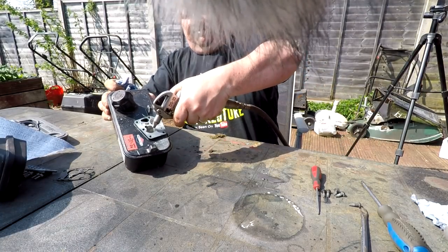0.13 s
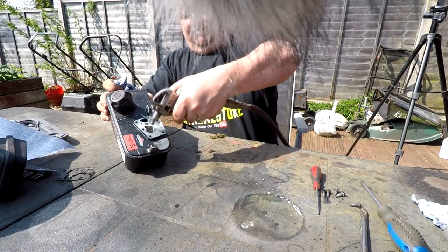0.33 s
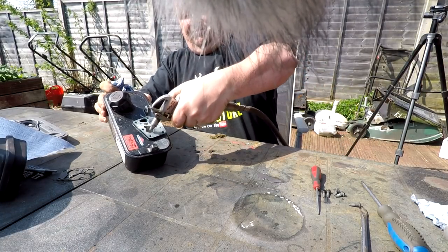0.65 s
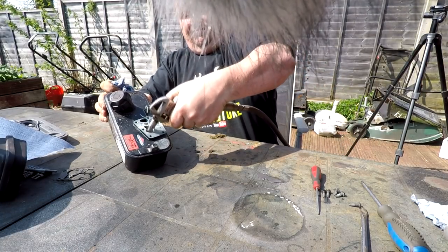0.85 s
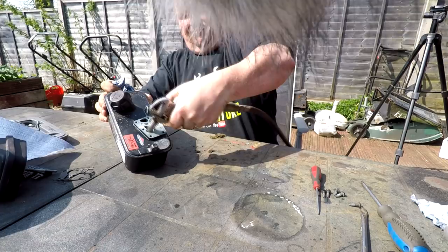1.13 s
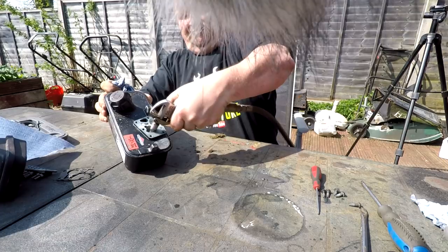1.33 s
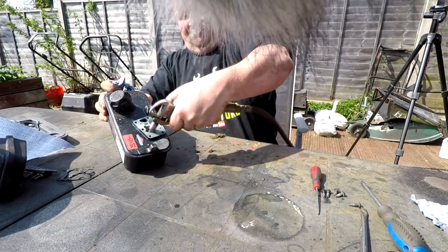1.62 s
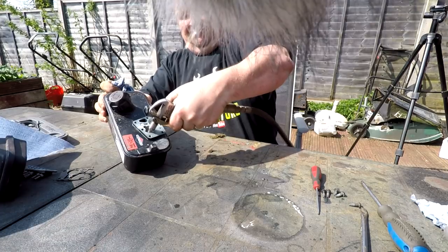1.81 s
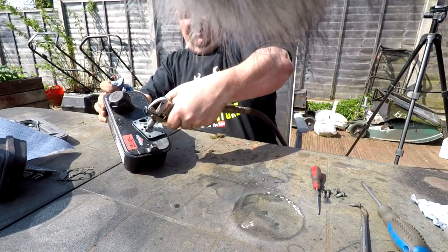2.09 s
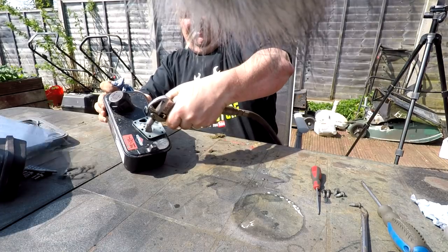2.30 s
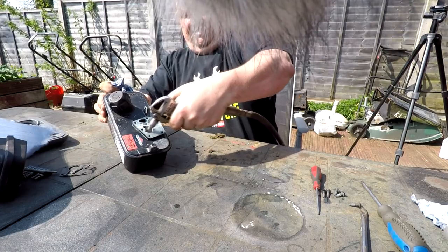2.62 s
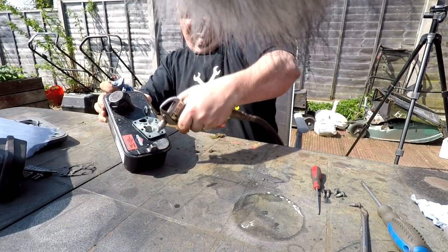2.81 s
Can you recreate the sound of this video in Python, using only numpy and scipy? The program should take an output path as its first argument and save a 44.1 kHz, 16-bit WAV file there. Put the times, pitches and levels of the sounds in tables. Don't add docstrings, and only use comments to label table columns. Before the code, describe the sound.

Compressed-air blow gun blasts a small metal part: one short burst, then a long roaring hiss

```python
import sys
import numpy as np
from scipy import signal
from scipy.fft import rfft, irfft
from scipy.io import wavfile
from scipy.ndimage import uniform_filter1d

SR = 44100
rng = np.random.default_rng(int(sys.argv[2]) if len(sys.argv) > 2 else 0)


def to_linear_factor(level_db):
    exponent = np.asarray(level_db, float) / 20
    return 10 ** exponent


def wav_record(signal):
    frames = np.transpose(np.atleast_2d(signal))
    bounded = np.clip(frames, -1, 1)
    quanta = np.round(bounded * 32767).astype(np.int16)
    wavfile.write(sys.argv[1], SR, quanta)


N = 130095
T = np.arange(N) / SR

# start_s, end_s, rise_s, release_s
TRIGGER_PULLS = [
    (.213, .425, .034, .013),
    (.559, 2.741, .032, .015),
]
SHUT_DB = -44

# frequency_hz, density_db (per Hz)
BUFFET_SPECTRUM = [(4.7, -34.5), (8.0, 6.5), (27, 7.5), (42, -6), (86, -8), (170, -17), (220, -76.5),
                   (370, -120)]
BUFFET_DB, BUFFET_CALM_DB, LUMP_DB = -51.5, -5, 5.5
# centre_s, length_s, pitch_hz, level_db
GUSTS_OF_AIR = [(.03, 0.048, 30.5, -52), (0.415, 0.036, 140, -51), (.7, .05, 110, -57),
                (1.397, .06, 60, -45), (2.012, .04, 100, -50), (2.656, 0.085, 76, -47.5),
                (0.316, 0.15, 34, -46), (0.776, 0.28, 20, -44), (0.98, .08, 21, -34),
                (1.24, 0.081, 28, -37), (1.361, 0.015, 140, -36.5), (1.452, 0.11, 42, -45),
                (1.567, 0.17, 21, -37.5), (1.575, 0.034, 150, -45), (1.8, 0.048, 18.4, -26.5),
                (1.984, 0.063, 14, -27), (2.075, 0.037, 28, -30), (2.21, 0.056, 26, -50.5),
                (2.462, 0.053, 54, -42), (2.565, 0.069, 26, -33), (2.777, 0.031, 18, -36.5),
                (2.848, 0.043, 16, -47), (0.2, 0.053, 8.6, -50)]
# frequency_hz, density_db (per Hz)
STILL_AIR_SPECTRUM = [(110, -30.5), (190, 1), (635, -11), (735, -13.5), (2950, -17), (3540, -13.5),
                      (5490, -23.5), (15000, -39)]
STILL_AIR_DB, HUM_HZ, HUM_DB = -75.5, 136, -72
EARLIER_DB, EARLIER_T60_S = -67, 0.17
BLEED_START_S, BLEED_HZ, BLEED_WIDTH_HZ, BLEED_DB, BLEED_T60_S = 2.72, 6450, 350, -66, .6

# pitch_hz, level_db, t60_s
CLINK_MODES = [(511, -3, 0.37), (700, -9, 0.21), (974, 0, 0.06), (1098, -1, 0.12), (1276, -14, 0.12),
               (1518, -14, 0.16), (1637, -2, 0.11), (2137, -23, 0.35), (2347, -7, 0.1), (2568, -9, 0.11),
               (2719, -6, 0.14), (2977, -1, 0.056)]
# start_s, ring_db, crack_db, crack_length_s, crack_top_hz
KNOCK_EVENTS = [
    (.2131, -54, -41, .004, 2300),
    (.2162, -52, -36, .007, 1700),
    (2.877, -45, -47, .003, 3400),
    (2.8783, -80, -65, .001, 12000),
    (2.8805, -53, -47, .007, 2800),
]
# start_s, pitch_hz, level_db, t60_s
SNAP_RINGS = [(.2155, 1572, -36, .05), (.2135, 495, -43, .09), (.2135, 964, -45, .09),
              (.2135, 200, -44, .08), (.415, 237, -46, .2), (.415, 3880, -62, .12), (2.73, 3375, -60, .09),
              (.415, 2762, -48, .19), (2.73, 1071, -57, .13), (2.8802, 600, -33, .015),
              (2.879, 380, -50, .09), (.42, 515, -64, .4), (2.878, 200, -52, .1)]

# time_s, roar_db, depth (0-1, deep pockets sound lower)
AIM_SHORT_BURST = [
    (.25, -20, 0.35),
    (.33, -18.5, 0.37),
    (.375, -26, 0.6),
    (.41, -28, 0.3),
]
AIM_LONG_SWEEP = [(0.6, -22, 0.45), (0.67, -21, 0.53), (0.84, -26.5, 0.56), (0.85, -24, 0.65),
                  (1.23, -24.5, 0.56), (1.26, -35.5, 0.54), (1.31, -22, 0.7), (1.41, -28, 0.38),
                  (1.45, -26.5, 0.66), (2.08, -24, 0.55), (2.14, -20.5, 0.42), (2.25, -24, 0.64),
                  (2.27, -36, 0.58), (2.4, -23.5, 0.61), (2.52, -19.5, 0.63), (2.55, -26, 0.52),
                  (2.68, -20.5, 0.62), (2.73, -49, 0.19)]
SWING_DB = -19
DEPTH_DB = 14
# centre_s, length_s, level_db
WRIST_FLICKS = [(0.23, 0.0096, -2.5), (0.585, 0.023, -5), (0.702, .05, -1), (2.11, 0.026, -1),
                (2.488, .05, 1), (2.626, 0.035, -2), (0.725, 0.021, 2.5), (0.904, 0.072, 1.5),
                (1.11, 0.056, 2.5), (1.479, 0.1, 4.5), (1.58, 0.043, 3.5), (1.636, 0.048, -3),
                (1.708, 0.057, 2.5), (1.778, 0.069, 0), (1.802, 0.011, 7), (1.885, 0.062, 3),
                (2.336, 0.047, -3), (2.454, 0.018, 1)]
# centre_s, length_s, level_db
HOLLOW_DROPS = [(0.256, 0.013, 3), (0.402, 0.036, -5), (0.596, 0.028, 0.5), (0.682, 0.065, 3),
                (2.65, 0.036, 2), (0.891, .025, 3.5), (1.01, 0.041, 2.5), (1.119, 0.017, -2.5),
                (1.28, 0.072, 6), (1.45, .08, -1), (1.574, 0.033, 3.5), (1.695, .05, 0.5),
                (1.828, 0.085, -4.5), (1.851, .03, 4.5), (1.99, 0.02, -4), (2.154, 0.09, -3.5),
                (2.211, 0.034, 1.5), (2.352, 0.056, 6.5), (2.422, 0.027, 6), (2.461, .015, -7),
                (2.472, 0.028, 6.5), (2.595, 0.023, 4), (2.714, 0.044, 6)]
# pitch_hz, width_hz, level_db, depth_share (of the depth change)
POCKET_RESONANCES = [(232.8, 53, -23.5, -0.84), (2452, 630, -6.5, 2), (3145, 527, 0, -0.15),
                     (3640, 560, -2, -0.78)]
# frequency_hz, density_db (per Hz)
BODY_SPECTRUM = [(59, -79), (100, -27.5), (236, -13), (1160, -9.5), (1360, -10.5), (3120, -5.5),
                 (4500, -10), (5850, -19), (9900, -120)]
BODY_DB, BODY_FOLLOW = -31.5, 0.45
# frequency_hz, density_db (per Hz)
HISS_SPECTRUM = [(2470, -53), (4200, -13.5), (5490, -7.5), (7760, -14.5), (8650, -8), (11100, -8),
                 (12400, -4), (14600, 0.5), (15600, -9)]
HISS_DB, HISS_FOLLOW = -28, 0.54
# pitch_hz, width_hz, level_db
BRUSHED_EDGES = [(5100, 300, -47), (7750, 420, -45), (12100, 600, -40), (14100, 600, -40)]
# centre_s, length_s, pitch_hz, width_hz, level_db
RIB_GLANCES = [(0.289, 0.1, 9560, 2410, -25), (0.343, 0.32, 12040, 3090, -32),
               (0.613, 0.12, 10360, 2500, -28), (0.703, 0.55, 13000, 1500, -36),
               (1.04, 0.16, 10500, 1994, -36), (1.187, 0.067, 14000, 990, -43.5),
               (1.338, 0.035, 10800, 4000, -30.5), (1.379, 0.08, 12660, 704, -23),
               (1.587, 0.078, 12600, 3000, -24), (1.588, 0.045, 8500, 4000, -34),
               (1.816, 0.033, 13000, 1960, -21.5), (2.423, 0.046, 13500, 3010, -47.5),
               (2.715, 0.078, 6250, 2500, -40), (2.3, 0.25, 7800, 4040, -42), (1.259, .05, 8000, 4010, -50),
               (0.774, .1, 13900, 693, -31), (0.883, .04, 13600, 1200, -31),
               (1.108, 0.043, 13200, 1800, -26.5), (1.337, 0.017, 12100, 600, -21.5),
               (1.621, 0.027, 12600, 680, -28.5), (1.0, .1, 14600, 900, -34)]
# pitch_hz, width_hz, level_db
JET_DIPS = [(1337, 89, -3.5), (5480, 375, -6.5), (8500, 130, -9), (10800, 610, -1.5)]
FLUTTER_DB, GUST_DB, PATCH_DB = 1.5, 2, 1.5

# pitch_hz, level_db, t60_s
SHAKEN_MODES = [(523, -7.5, 0.25), (1234, -2.5, 0.092)]
SHAKEN_DB = -29.5
# frequency_hz, t60_s
YARD_DECAY = [(200, .5), (1000, .55), (3500, .6), (8000, .36), (15000, .28)]
# frequency_hz, level_db
YARD_COLOUR = [(300, 6.5), (1200, 6.5), (2300, -3), (3100, -6), (4000, 2.5), (6000, 5), (10000, 3.5)]
YARD_DB = -29.5

# start_s, length_s, top_pitch_hz, level_db, top_place (0-1 of the length)
BORE_WHISTLES = [
    (1.231, .03, 15170, -24, .47),
    (2.346, .02, 15250, -27, .25),
    (1.2245, .009, 5200, -26, .6),
    (1.25, .016, 5100, -45, .2),
    (2.28, .04, 5140, -32, .85),
    (2.32, .037, 5080, -41, .4),
]
DROOP = 950


def evened(x):
    return x / np.sqrt(np.mean(x ** 2) + 1e-20)


def read(points, hz):
    f, value = np.transpose(points)
    return np.interp(np.log(hz + 1), np.log(f + 1), value)


def shaped_noise(gain):
    return evened(irfft(rfft(rng.standard_normal(N)) * gain, N))


def coloured(points):
    return shaped_noise(to_linear_factor(read(points, np.fft.rfftfreq(N, 1 / SR))))


def band(hz, width, steep=1.83):
    f = np.fft.rfftfreq(N, 1 / SR)
    return shaped_noise(1 / (1 + abs((f - hz) / width * 1.65) ** steep))


def drift(rate_hz):
    f = np.fft.rfftfreq(N, 1 / SR)
    return shaped_noise(np.exp(-(f / rate_hz) ** 2) * (f > 2))


def bump(s, length, order=4):
    return np.exp(-abs(2 * (T - s) / length) ** order)


def modes(table, length):
    t = np.arange(int(length * SR)) / SR
    return sum(to_linear_factor(db - 60 * t / t60) * np.sin(2 * np.pi * hz * t) for hz, db, t60 in table)


def flow():
    out = np.zeros(N)
    for start, end, rise, release in TRIGGER_PULLS:
        opening = np.clip(1 - (T - start) / rise, 0, 1) ** 1.5
        closing = np.clip(1 - (end - T) / release, 0, 1) ** 1.3
        out += to_linear_factor(SHUT_DB * np.maximum(opening, closing)) * (T > start) * (T < end)
    return out


def buffeting():
    stirred = uniform_filter1d(flow(), size=6000)
    wind = coloured(BUFFET_SPECTRUM)
    out = wind * to_linear_factor(BUFFET_DB + BUFFET_CALM_DB * (1.0 - stirred) + LUMP_DB * drift(9.5))
    waver = drift(4.5)
    for s, length, hz, db in GUSTS_OF_AIR:
        out += to_linear_factor(db - 2) * bump(s, length, order=2) * np.sin(2 * np.pi * hz * T + 1.4 * waver)
    return out


def far_hum():
    return to_linear_factor(HUM_DB) * band(HUM_HZ, 8)


def quiet_yard():
    still = to_linear_factor(STILL_AIR_DB) * coloured(STILL_AIR_SPECTRUM)
    return still + to_linear_factor(EARLIER_DB - 60 * T / EARLIER_T60_S) * coloured(BODY_SPECTRUM)


def knocks():
    out, ring = np.zeros(N), modes(CLINK_MODES, 0.24)
    t = np.arange(len(ring)) / SR
    for s, ring_db, crack_db, length, top_hz in KNOCK_EVENTS:
        lowpass = signal.butter(5, top_hz, fs=SR, output="sos")
        crack = signal.sosfilt(lowpass, rng.standard_normal(len(t)) * np.exp(-t / length))
        knock = to_linear_factor(ring_db) * ring * np.minimum(t / .0012, 1) + to_linear_factor(crack_db + 9) * crack
        part = out[round(s * SR):][:len(t)]
        part += knock[:len(part)]
    return out


def snap_rings():
    out = np.zeros(N)
    for s, hz, db, t60 in SNAP_RINGS:
        since = np.maximum(T - s, 0)
        onset = np.minimum(since / .001, 1)
        out += onset * to_linear_factor(db - 60 * since / t60) * np.sin(2 * np.pi * hz * since)
    return out


def patchy(x):
    cycles, t, z = signal.stft(x, nperseg=512)
    field = uniform_filter1d(rng.standard_normal(z.shape[::-1]), size=8, axis=0)
    field = evened(uniform_filter1d(field, size=8, axis=1))
    depth_db = PATCH_DB * np.minimum(0.93 + 9 * cycles, 1)[:, None]
    return signal.istft(z * to_linear_factor(depth_db * field.T), nperseg=512)[1][:N]


def jet():
    s, roar_db, depth = np.transpose(list(AIM_SHORT_BURST) + list(AIM_LONG_SWEEP))
    aim_db = np.interp(T, s, roar_db) + sum(db * bump(at, length) for at, length, db in WRIST_FLICKS)
    depth_db = DEPTH_DB * (np.interp(T, s, depth) - .5)
    swing_db = aim_db - SWING_DB
    hollow_db = sum(db * bump(at, length, order=2) for at, length, db in HOLLOW_DROPS)
    gust = drift(38)

    def shake(share):
        return to_linear_factor(share * GUST_DB * gust + FLUTTER_DB * drift(160))

    pocket = np.zeros(N)
    for hz, width, db, share in POCKET_RESONANCES:
        level_db = db + share * depth_db + (hz < 1000) * hollow_db
        pocket += to_linear_factor(level_db) * band(hz, width, steep=3.1)
    pocket = evened(pocket) * to_linear_factor(aim_db)

    body = coloured(BODY_SPECTRUM) * to_linear_factor(BODY_DB + hollow_db + BODY_FOLLOW * swing_db) * shake(0.59)

    hiss = coloured(HISS_SPECTRUM) * to_linear_factor(HISS_DB)
    hiss = hiss + sum(to_linear_factor(db) * band(hz, width) for hz, width, db in BRUSHED_EDGES)
    hiss = hiss * to_linear_factor(HISS_FOLLOW * swing_db) * shake(0.12)

    ribs = np.zeros(N)
    for at, length, hz, width, db in RIB_GLANCES:
        ribs += to_linear_factor(db) * band(hz, width) * bump(at, length, order=2)

    air = patchy(pocket * shake(0.16) + body + hiss + ribs * shake(0.16))
    f = np.fft.rfftfreq(N, 1 / SR)
    dips_db = sum(db * np.exp(-((f - hz) / width) ** 2) for hz, width, db in JET_DIPS)
    return flow() * irfft(rfft(air) * to_linear_factor(dips_db), N)


def shaken_casting(air):
    ring = modes(SHAKEN_MODES, .5)
    return to_linear_factor(SHAKEN_DB) * signal.fftconvolve(air, ring / np.linalg.norm(ring))[:N]


def yard(x):
    hz, t, z = signal.stft(rng.standard_normal(SR // 2), SR, nperseg=256)
    decay_db = read(YARD_COLOUR, hz)[:, None] - 60 * t / read(YARD_DECAY, hz)[:, None]
    tail = signal.istft(z * to_linear_factor(decay_db), SR, nperseg=256)[1]
    return signal.fftconvolve(x, tail / np.linalg.norm(tail))[:N]


def whistles():
    out, waver = np.zeros(N), drift(120)
    for start, length, hz, db, top in BORE_WHISTLES:
        u = (T - start) / length
        sag = DROOP * abs(hz / 5000 * (u - top) * length) ** 3
        pitch = hz * (1 - sag + .007 * waver)
        shape = np.sin(np.pi * np.clip(u, 0, 1)) ** .4 * to_linear_factor(db + 4 + 2.2 * waver)
        out += shape * np.sin(2 * np.pi * np.cumsum(pitch * (u > 0) * (u < 1)) / SR)
    return out


def bleed():
    since = np.maximum(T - BLEED_START_S, 0)
    level = to_linear_factor(BLEED_DB - 60 * since / BLEED_T60_S)
    return (T > BLEED_START_S) * level * band(BLEED_HZ, BLEED_WIDTH_HZ)


def scene():
    air = jet() + whistles()
    near = air + shaken_casting(air) + knocks() + snap_rings()
    echo = to_linear_factor(YARD_DB) * yard(near)
    background = buffeting() + far_hum() + bleed() + quiet_yard()
    return (near + echo + background)[None]


def low_pass(x):
    return signal.sosfilt(signal.butter(12, 15700, fs=SR, output="sos"), x)


def record(dry):
    lowpass = signal.firwin(511, 15230, window=("kaiser", 9), fs=SR)
    mix = signal.oaconvolve(dry, lowpass[None], "same")
    return low_pass(mix)


dry = scene()
out = record(dry)
wav_record(out)
```